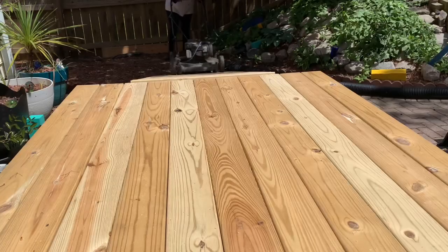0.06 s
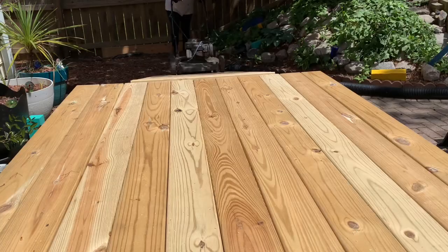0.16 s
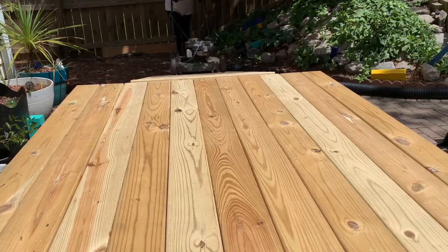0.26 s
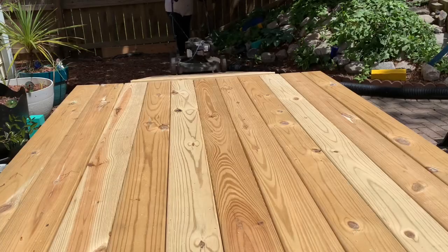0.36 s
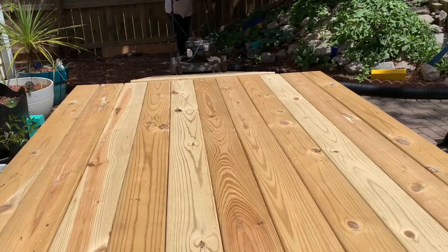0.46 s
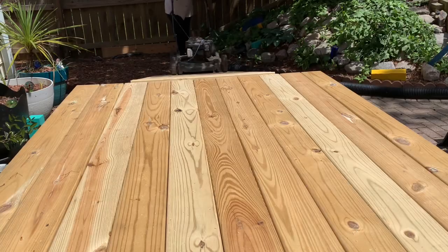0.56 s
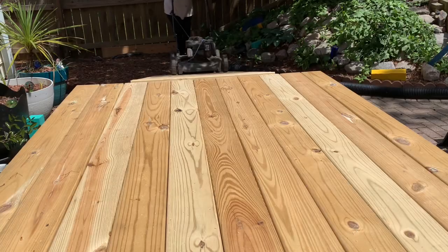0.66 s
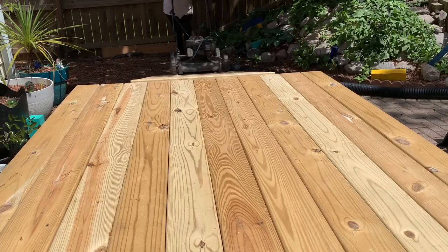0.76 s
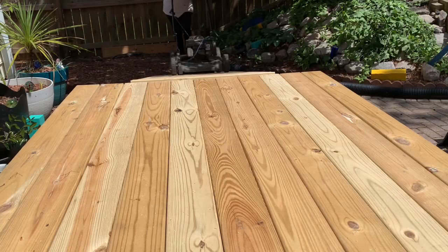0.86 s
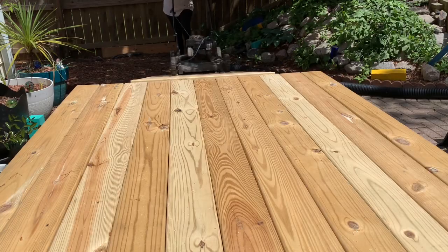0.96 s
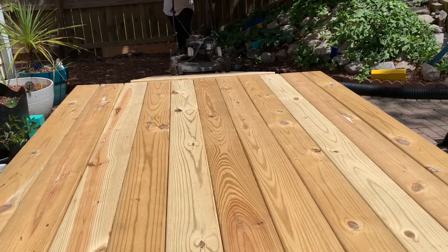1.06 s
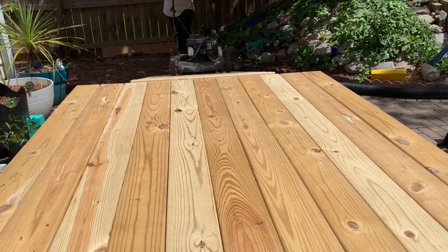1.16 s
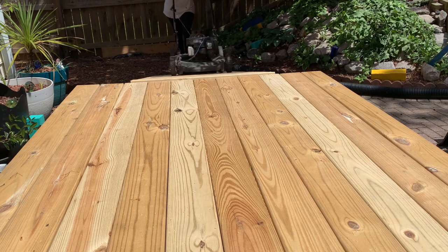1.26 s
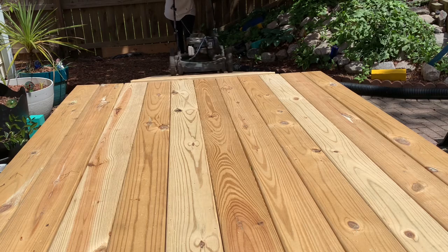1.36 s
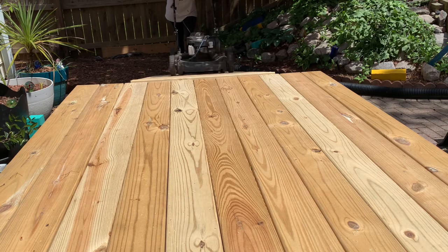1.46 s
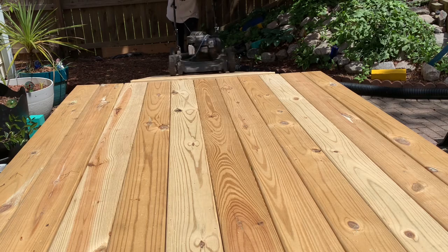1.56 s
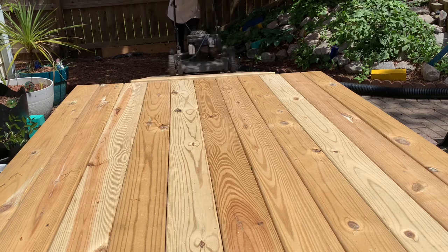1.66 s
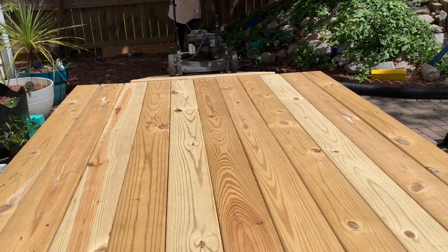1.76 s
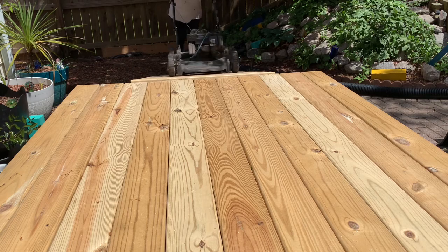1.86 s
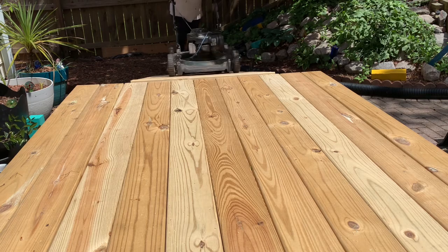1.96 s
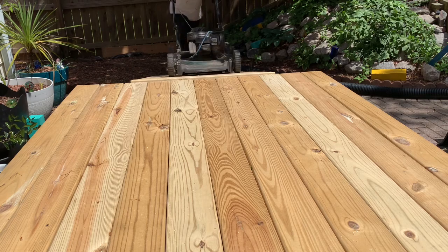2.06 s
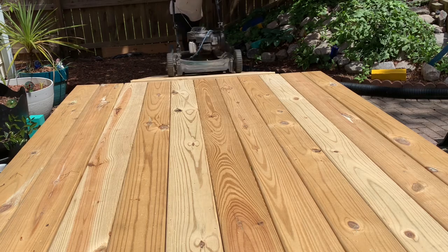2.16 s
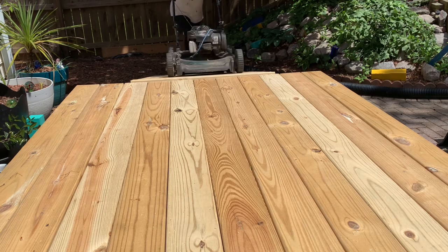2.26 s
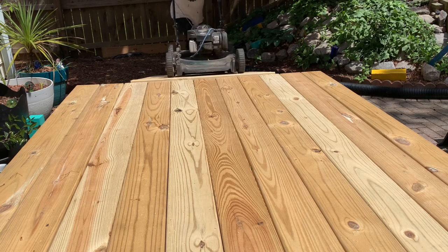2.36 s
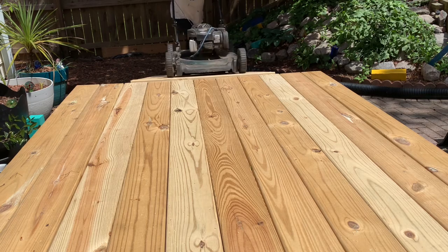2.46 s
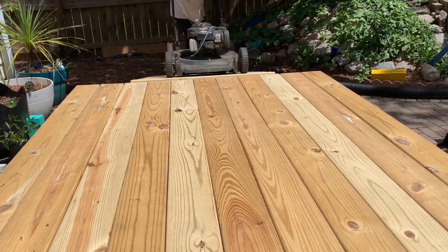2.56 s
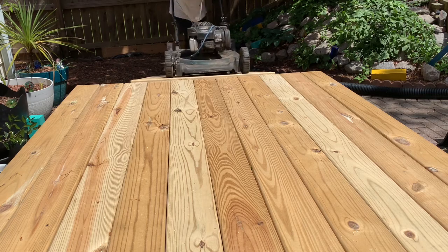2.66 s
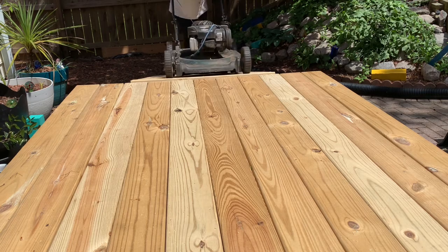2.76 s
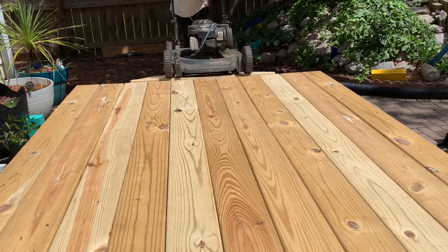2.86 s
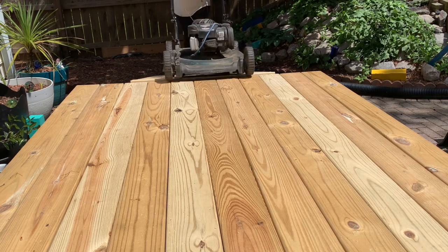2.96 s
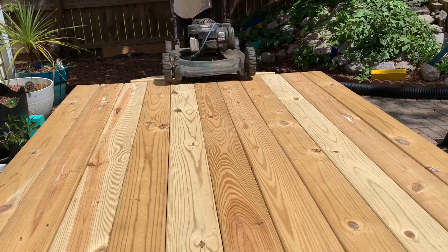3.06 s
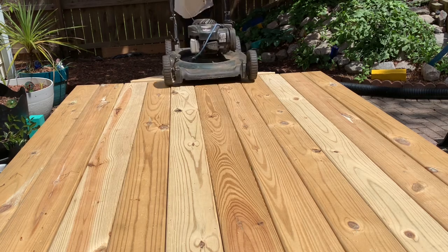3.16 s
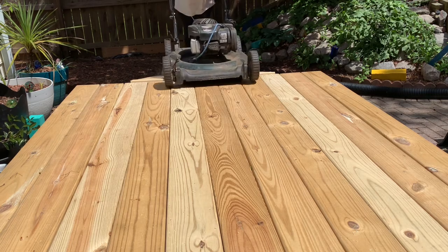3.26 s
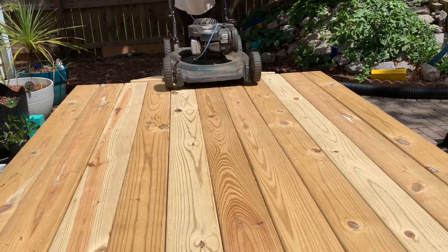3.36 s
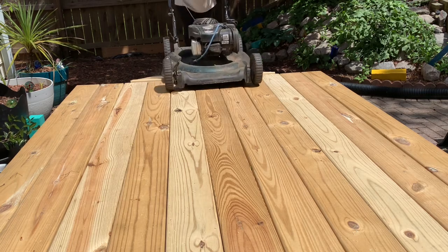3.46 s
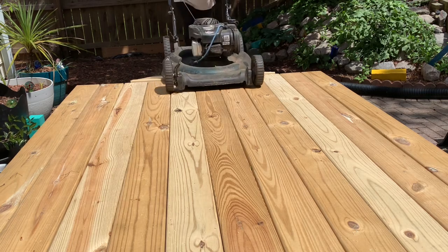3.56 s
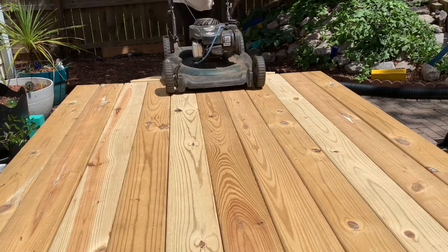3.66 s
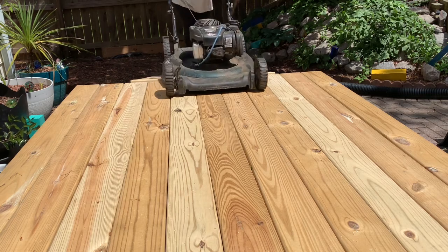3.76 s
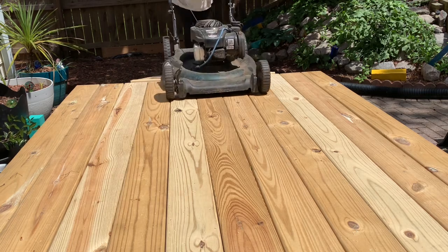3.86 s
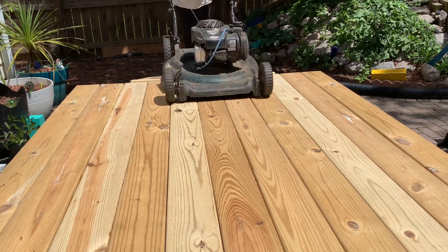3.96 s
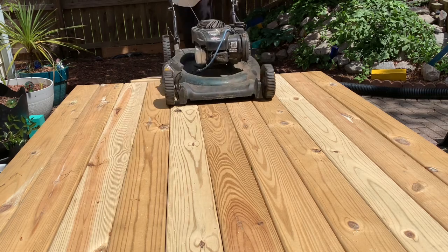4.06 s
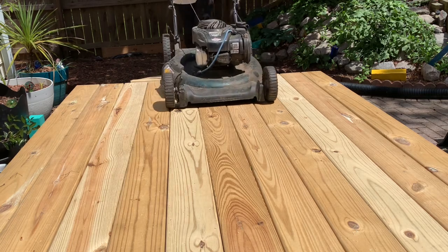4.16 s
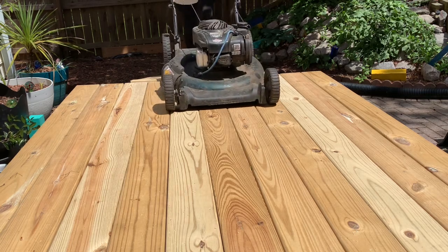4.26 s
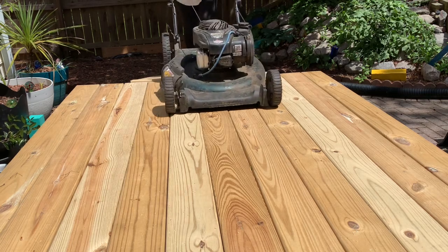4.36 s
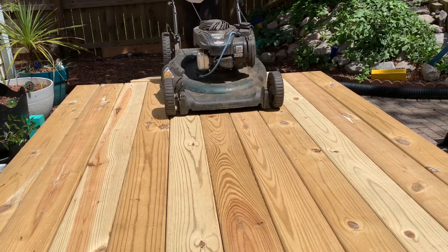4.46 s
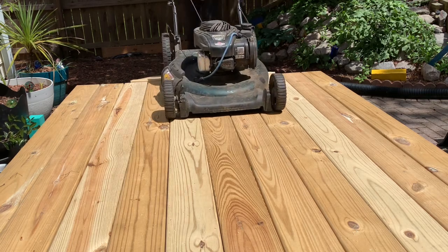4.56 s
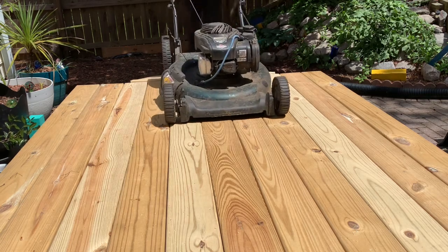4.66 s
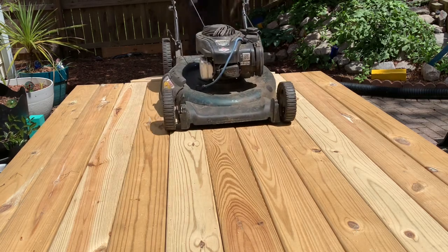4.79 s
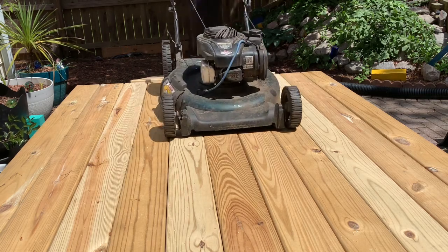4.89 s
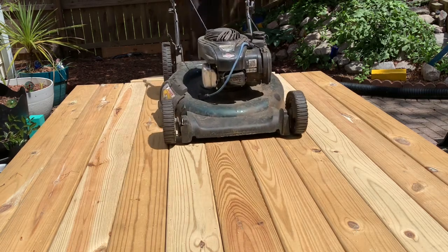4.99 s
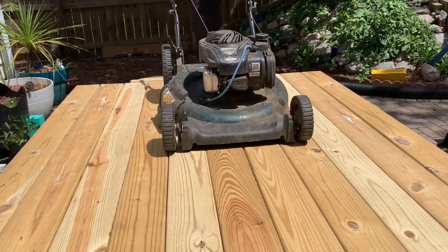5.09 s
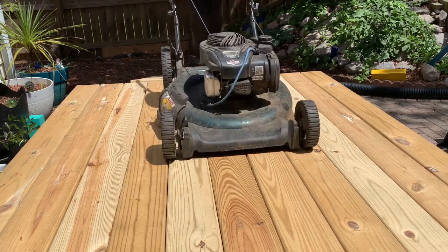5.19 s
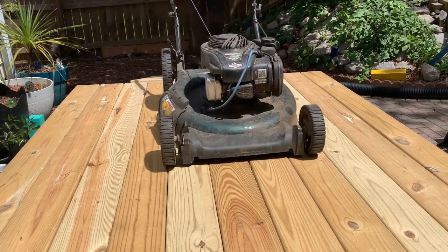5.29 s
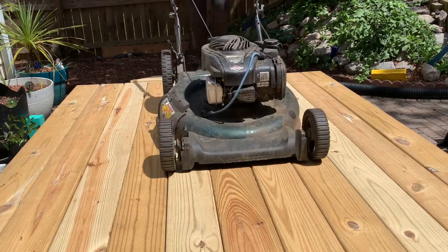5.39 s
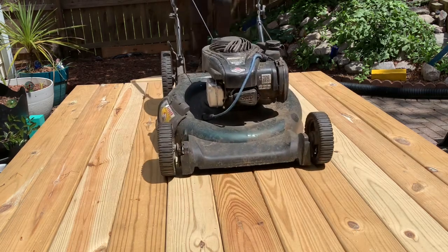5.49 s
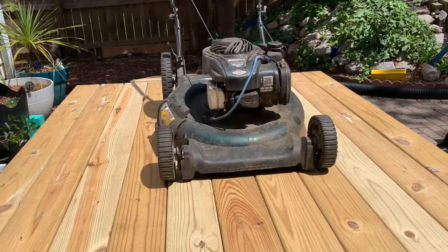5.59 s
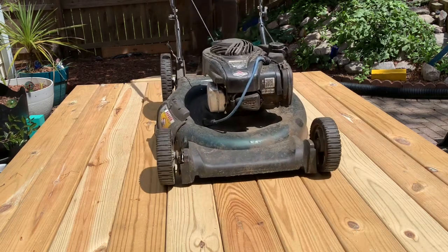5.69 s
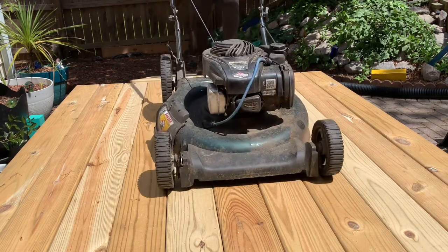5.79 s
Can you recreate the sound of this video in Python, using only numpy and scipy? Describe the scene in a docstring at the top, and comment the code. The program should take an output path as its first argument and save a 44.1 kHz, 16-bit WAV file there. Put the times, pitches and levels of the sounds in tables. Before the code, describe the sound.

A push mower with its engine off is wheeled over gritty ground, crunching softly over a low wooden boom. Knocks and loose clacks grow, then the steel housing slams and scrapes over a deck edge around three seconds. It rolls onto the boards with drumming, tread chatter and a burst of rattling, then a brief rasp. Open yard, fixed stereo microphone near the boards, faint outdoor air.

```python
"""A push mower, engine off, is rolled from rough ground up onto a deck of wooden boards in a fenced yard.
From the start the platform booms, boards drum, tyres crunch and dry litter rustles; wheels knock and grit snaps.
From 1.2 s loose hubs clack and washers jingle; from 2.9 to 3.9 s the steel housing drags over a board edge.
At 4.2 s tread slaps and chatter replace the crunch, and near 5.5 s the housing drags again, briefly.
Random impacts excite resonant modes and shaped spectra; the yard scatters them in stereo over faint outdoor air."""
import sys
import numpy as np
from scipy import signal
from scipy.fft import rfft, irfft
from scipy.io import wavfile
from scipy.ndimage import uniform_filter1d, map_coordinates

SR = 44100
rng = np.random.default_rng(int(sys.argv[2]) if len(sys.argv) > 2 else 0)


def unload_wav(signal):
    """Save mono or channel-first audio to the path in sys.argv[1] as 16-bit WAV at rate SR, clipped to [-1, 1]."""
    wavfile.write(
        sys.argv[1],
        SR,
        np.round(np.clip(np.atleast_2d(signal).T, -1, 1) * 32767).astype(np.int16),
    )


N = 257103
TIME = np.arange(N) / SR
ON_BOARDS_S = 4.2  # tread slaps and chatter replace the crunch


def undb(db):
    """Logarithmic level: decibels become an amplitude ratio."""
    return 10 ** (np.asarray(db) / 20)


def unit(x):
    """Normalisation by mean power: the rms becomes 1."""
    return x / np.sqrt(np.mean(x ** 2) + 1e-18)


def attack(x, size=1323):
    """Normalisation by onset power: the rms over the first 30 ms becomes 1."""
    return x / np.sqrt(np.mean(x[:size] ** 2))


def steady(x, span_s):
    """Automatic levelling: the running rms over span_s is held near 1."""
    power = uniform_filter1d(x ** 2, int(span_s * SR))
    return x / np.sqrt(power + np.mean(x ** 2) / 20)


def fade(t, t60):
    """Exponential damping: the level falls 60 dB in t60 seconds."""
    return np.exp(-np.log(1000) * t / t60)


def envelope(start, end, rise_s, release_t60):
    """Exponential growth up to start, a hold until end, then exponential damping."""
    rise = np.exp(np.minimum(TIME - start, 0) / rise_s)
    return rise * fade(np.maximum(TIME - end, 0), release_t60)


def walk(per_s):
    """Random modulation: smoothed random steps wander with rms 1."""
    step = int(SR / per_s)
    held = rng.standard_normal(N)[np.arange(N) // step]
    return unit(uniform_filter1d(held, step))


def add(track, s, sound):
    """Linear superposition: a sound is mixed in at time s."""
    start = max(int(s * SR), 0)
    part = sound[:N - start]
    track[start:start + len(part)] += part


def through(x, response):
    """Linear filtering: an excitation is convolved with an impulse response."""
    return signal.oaconvolve(x, response)[:len(x)]


def colour(points, size=4096):
    """Minimum phase: a folded cepstrum gives a causal, unit-energy response of the given spectral shape."""
    hz, db = np.transpose(points)
    f = np.maximum(np.arange(size // 2 + 1) * SR / size, 1)
    level_db = np.interp(np.log(f), np.log(hz), db)
    cepstrum = irfft(np.log(undb(level_db)))
    cepstrum[1:size // 2] *= 2
    cepstrum[size // 2 + 1:] = 0
    return unit(irfft(np.exp(rfft(cepstrum)))) / np.sqrt(size)


def body(modes, points, ring_db, size=16384):
    """Modal superposition: a dead blow plus damped modes, neighbours in opposite senses."""
    t = TIME[:size]
    ring = np.zeros(size)
    for k, (hz, db, t60) in enumerate(modes):
        ring += (-1) ** k * undb(db) * np.sin(2 * np.pi * hz * t) * fade(t, t60)
    blow = colour(points)
    dead_blow = np.pad(blow, (0, size - len(blow)))
    return dead_blow + undb(ring_db) * unit(ring) / np.sqrt(size)


def note(hz, t60, rise_s, size=16384):
    """A single damped mode: a sine swells over about rise_s and dies away."""
    t = TIME[:size]
    return attack(np.sin(2 * np.pi * hz * t) * fade(t, t60) * (1 - fade(t, rise_s)))


def contacts(per_s, scatter_db, size=N):
    """Random impulse excitation: small impacts of uneven strength and either sign."""
    chance, strength = rng.random(size), rng.standard_normal(size)
    struck = chance < per_s / SR
    return struck * undb(scatter_db * np.clip(strength, -2, 2)) * rng.choice([-1, 1], size)


def impact(t60, first_db, size=16384):
    """Repeated impact: an opening blow of set strength, then a dense burst of uneven contacts that dies away."""
    burst = unit(contacts(per_s=2600, scatter_db=5.0, size=size))
    force = burst * fade(TIME[:size], t60)
    force[0] = undb(first_db)
    return force


# Spectrum of the outdoor air. Each row: frequency in Hz, relative level in dB.
AIR_SPECTRUM = [(20, -29), (35, -3), (55, 13.5), (120, -2.5), (300, -29.5), (1000, -20.5), (3000, -36.5),
                (7000, -51.5), (11000, -42.5), (13500, -55.5), (16000, -82)]


def outdoor_air():
    """Broadband noise: white noise takes on the spectrum of faint outdoor air."""
    return undb(-33.5) * through(rng.standard_normal(N), colour(AIR_SPECTRUM))


TREAD_PER_S = 47.5  # tread blocks meeting the boards


def tread(jitter, scatter_db):
    """Near-periodic excitation: tread blocks slap the boards one after another."""
    slaps, chance = np.zeros(N), rng.standard_normal((N // 500, 2))
    at = ON_BOARDS_S + np.cumsum(np.exp(jitter * chance[:, 0])) / TREAD_PER_S
    heard = at < TIME[-1]
    slaps[(at[heard] * SR).astype(int)] = undb(scatter_db * chance[heard, 1])
    return slaps


# How hard the rolling wheels shake the mower, from speed and ground together.
# Each row: time in seconds, effort in dB.
EFFORT = [(0, -7), (0.92, -10.5), (1.3, -1), (1.68, 2), (1.92, -2), (2.17, -2), (2.45, 1.5), (2.9, -3.5),
          (3.17, 1.5), (3.4, -8.5), (3.92, 2), (4.2, -6.5), (4.5, -11.5), (4.68, 5), (5.07, 5), (5.42, -8),
          (5.72, -7), (5.83, -21)]
# Modes of the platform (lowest only), boards, steel housing, and wheel hubs with handle fittings.
# Each row: frequency in Hz, relative level in dB, t60 in seconds.
PLATFORM_MODES = [(102.46, -12.5, 0.83), (101.9, -17.5, 1)]
BOARD_MODES = [(59.5, -20, 0.46), (123.1, 2.5, 0.21), (131, 2, 0.38), (150.2, 5.5, 0.23), (168, -3, 0.023),
               (222.2, -6.5, 0.33), (232.7, 0.5, 0.25)]
HOUSING_MODES = [(270.3, 3.5, 0.32), (314, -2, 0.16), (369.4, 9, 0.081), (397.9, 7.5, 0.28),
                 (446, -17, 0.016), (519, -2, 0.26), (595, -15.5, 0.29), (649.6, 14, 0.039),
                 (659, 9.5, 0.072), (860, -32.5, 0.45), (879, -31.5, 0.067), (890, -19, 0.15),
                 (1150, -39.5, 0.19), (1130, -24, 0.067), (1340, -33.5, 0.036), (1540, -54.5, 0.051),
                 (1670, -21.5, 0.087), (1900, -40, 0.12)]
FITTING_MODES = [(2100, 40, 0.036), (2000, 2, 0.062), (2480, 9, .1), (2600, 15, 0.06), (2720, 7, 0.1),
                 (2960, -13.5, .06), (3190, -2, 0.13), (3950, -14.5, 0.05), (4500, -11, 0.04)]
# Spectra of boom, drumming, hum, crunch and rattle. Each row: frequency in Hz, relative level in dB.
BOOM_SPECTRUM = [(40, -26), (75, 7.5), (100, 12.5), (120, 24), (250, -35.5)]
DRUM_SPECTRUM = [(20, -37), (40, -28.5), (60, -10.5), (100, -1.5), (140, 1), (240, -5), (330, -6.5),
                 (600, -39), (1500, -89)]
HUM_SPECTRUM = [(120, -38), (230, 8.5), (380, 2), (520, -3.5), (720, -9.5), (1000, -18), (1500, -27.5),
                (3000, -70)]
CRUNCH_SPECTRUM = [(400, -4), (1000, 21.5), (1500, 13.5), (2000, 10), (3200, 10.5), (4700, 1.5),
                   (6500, -20.5), (11000, -39), (13500, -31), (16000, -55.5)]
RATTLE_SPECTRUM = [(400, -27), (1000, 14), (1450, 13), (1800, 3.5), (2150, 4), (2800, 1), (3500, -1.5),
                   (4900, -9.5), (6500, -28.5), (11000, -41), (13500, -51.5), (16000, -33.5)]
# level at effort 0 in dB, and growth in dB per dB of effort
BOOM_DB, BOOM_GROWTH = -25, 1
DRUM_DB, DRUM_GROWTH = -15.5, 1
HUM_DB, HUM_GROWTH = -23, 1
CRUNCH_DB, CRUNCH_GROWTH = -46.5, 1.62
CHATTER_DB, CHATTER_GROWTH = -47, 1.27
CRUNCH_PATCHY_DB = 2.5  # the ground is loose in patches
TREAD_DRUM_DB, TREAD_CHATTER_DB = 11.5, 4.5  # a slap against one random bump, in boards and in fittings


def rolling():
    """Roughness excitation: bumps under the wheels drive platform, boards, housing, ground and fittings."""
    effort = np.interp(TIME, *np.transpose(EFFORT))
    slaps = tread(jitter=.04, scatter_db=0.0)
    bumps = contacts(per_s=1500, scatter_db=-0.5)

    loads = contacts(per_s=500, scatter_db=7.5)
    platform = steady(through(loads, body(PLATFORM_MODES, BOOM_SPECTRUM, ring_db=12.5)), span_s=0.19)
    drumming = bumps + undb(TREAD_DRUM_DB) * slaps
    boards = steady(through(drumming, body(BOARD_MODES, DRUM_SPECTRUM, ring_db=-1.5)), span_s=0.093)
    shaking = bumps + contacts(per_s=320, scatter_db=-0.5)
    housing = unit(through(shaking, body(HOUSING_MODES, HUM_SPECTRUM, ring_db=-7.0)))
    ground = unit(through(contacts(per_s=380, scatter_db=2.0), colour(CRUNCH_SPECTRUM)))
    rattling = contacts(per_s=82, scatter_db=-0.5) + undb(TREAD_CHATTER_DB) * slaps
    fittings = unit(through(rattling, body(FITTING_MODES, RATTLE_SPECTRUM, ring_db=-12.0)))

    boom = undb(BOOM_DB + BOOM_GROWTH * effort) * platform
    drum = undb(DRUM_DB + DRUM_GROWTH * effort) * boards
    hum = undb(HUM_DB + HUM_GROWTH * effort) * housing
    patches_db = CRUNCH_PATCHY_DB * walk(per_s=22)
    crunch = undb(CRUNCH_DB + CRUNCH_GROWTH * effort + patches_db) * ground
    chatter = undb(CHATTER_DB + CHATTER_GROWTH * effort) * fittings
    return boom + drum + hum + np.where(TIME < ON_BOARDS_S, crunch, chatter)


# The platform gives under the mower's weight. Each row: start in seconds, relative peak level in dB.
BOOMS = [(0.0, -22.5), (0.882, -23), (1.162, -18), (1.599, -7.5), (2.26, -11.5), (2.498, -27), (3.883, -14),
         (4.677, -18), (4.85, -9)]
BOOM_RISE_S, BOOM_T60_S = 0.09, 0.74


def booms(size=32768):
    """Transient response: as weight shifts to a new spot, the platform's first listed mode swells and decays."""
    out, t = np.zeros(N), TIME[:size]
    mode = np.sin(2 * np.pi * PLATFORM_MODES[0][0] * t)
    ring = mode * (1 - fade(t, BOOM_RISE_S)) * fade(t, BOOM_T60_S)
    for s, db in BOOMS:
        add(out, s, undb(db) * ring / np.max(ring))
    return out


# Dry litter brushed aside. Each row: middle in seconds, Gaussian half length in seconds, relative level in dB.
RUSTLES = [(0.04, 0.028, -64.5), (0.393, 0.11, -63), (0.634, 0.036, -63.5), (0.9, 0.026, -75),
           (1.327, 0.058, -49), (1.634, 0.1, -60), (2.454, 0.09, -58), (3.157, 0.017, -22)]
# Grit cracking under the tyres. Each row: start in seconds, relative level in dB.
GRIT = [(0.2434, -35), (0.3087, -29.5), (0.371, -30), (1.5857, -23.5), (3.044, -12.5), (3.1585, -9),
        (4.298, -31), (4.691, -27), (4.8578, -10), (5.225, -21.5), (5.274, -15)]
# Spectrum shared by grit and litter. Each row: frequency in Hz, relative level in dB.
GRIT_SPECTRUM = [(800, 20), (2500, 5), (5000, 2), (8000, -2.5), (10500, 8.5), (13000, -3), (16000, -8)]


def litter(size=8192):
    """Fracture noise: leaves crush as impulses in soft swells, and grit snaps as decaying noise."""
    swell = np.zeros(N)
    for s, width, db in RUSTLES:
        swell += undb(db) * np.exp(-.5 * ((TIME - s) / width) ** 2)
    leaves = undb(11.5) * swell * unit(contacts(per_s=6000, scatter_db=0.5))
    snaps = np.zeros(N)
    for s, db in GRIT:
        snap = rng.standard_normal(size) * fade(TIME[:size], t60=0.13)
        add(snaps, s, undb(db - 12.0) * snap)
    return through(snaps + leaves, colour(GRIT_SPECTRUM))


def bend(x, lag_s, size=32768):
    """Dispersion of bending waves: the lower the pitch, the later it arrives (lag_s at 300 Hz)."""
    f = np.arange(size // 2 + 1) * SR / size
    phase = 4 * np.pi * lag_s * np.sqrt(300 * f)  # group delay is lag_s * sqrt(300 / f)
    return irfft(rfft(x, size) * np.exp(-1j * phase))[:len(x)]


# Wheels knocking over board edges. Each row: start in seconds, relative thud level in dB,
# ring of the struck spot in Hz and its level in dB, hollow note of the wheel in Hz and its level in dB,
# clank level in dB, crack level in dB, t60 of spot ring and contact burst in seconds.
KNOCKS = [(0.256, -15.5, 210, -21, 680, -42, -40, -58, 0.25),
          (0.552, -15.5, 333, -34, 690, -41, -34, -56, 0.29),
          (0.856, -17, 238.4, -29, 694, -45, -40, -60, 0.35),
          (1.112, -19.5, 156, -17.5, 710, -40, -52, -68, 0.055),
          (1.181, -15.5, 126, -18, 706, -54, -31.5, -40, 0.46),
          (1.388, -11, 141.4, -15, 640, -30.5, -27, -43.5, 0.53),
          (1.576, -9, 200, -23, 750, -31, -25, -36, 0.25),
          (1.644, -18, 235, -19, 680, -54, -39, -49, 0.067),
          (1.766, -11, 343.2, -19.5, 680, -37, -27.5, -44, 0.34),
          (1.973, -5.5, 390, -17, 777, -23.5, -23.5, -40, 0.15),
          (2.213, -9, 383.5, -10.5, 735, -24, -23, -35.5, 0.25),
          (2.404, -18, 373, -22.5, 900, -47, -19.5, -32, 0.083),
          (2.419, -5, 135, -13, 662, -21, -20, -30.5, 0.16),
          (2.438, -8, 213.2, -11.5, 620, -39, -25, -39, 0.19),
          (2.643, -9.5, 403, -18.5, 639, -25, -33, -41.5, 0.17),
          (2.925, -21, 303, -25, 710, -16, -17, -27, 0.18),
          (2.94, -7.5, 156, -13, 830, -20.5, -18.5, -33, 0.11),
          (2.985, -12.5, 275, -19, 980, -29, -34, -33, 0.064),
          (3.027, -19, 298, -19, 1190, -25.5, -28, -34, 0.057),
          (3.05, -18, 425, -25, 605, -20.5, -28, -27, 0.061),
          (3.067, -15, 437, -14, 669, -7, -12.5, -23, .14),
          (3.076, 1, 292, -12, 803, -15, -6.5, -13.5, 0.066),
          (3.084, 2, 287.4, -1, 950, -17, -7, -16, 0.11), (3.113, -3, 255, -13, 454, -10, -8.5, -23, 0.089),
          (3.139, -7, 188.6, -17, 900, -23, -12, -17.5, 0.19),
          (3.166, -13, 290, -16, 1104, -21, -17.5, -22.5, 0.1),
          (3.189, -14, 149, -14.5, 696, -34, -28, -36, 0.12),
          (3.238, -10.5, 248, -22, 700, -27, -20.5, -34, 0.3),
          (3.548, -15, 251, -23, 517, -51, -30, -52, .15),
          (3.63, -12.5, 234, -17, 1070, -31.5, -26.5, -45, 0.1),
          (3.747, -10, 250, -16.5, 594, -35, -30, -47, 0.13),
          (3.833, -5, 165, -12, 1000, -37, -21.5, -42, 0.13),
          (3.907, -9.5, 123.4, -8, 680, -45, -32, -43, 0.078),
          (3.975, -21.5, 221.6, -19.5, 690, -50, -40, -63, 0.26),
          (4.085, -18, 233, -23, 690, -52, -38, -49, 0.1),
          (4.208, -28, 201, -29, 566, -42, -45, -51.5, 0.1),
          (4.238, -8.5, 195, -16.5, 730, -37, -30, -41.5, 0.24),
          (4.252, -14, 287, -18, 1050, -32, -35, -36, 0.18),
          (4.269, -9.5, 270.6, -14, 790, -30, -24, -36, 0.15),
          (4.477, -24, 230, -36, 573, -42, -42, -57, 0.22),
          (4.604, -11.5, 238, -19.5, 687, -29, -23.5, -35.5, 0.25),
          (4.6227, -8, 308, -29, 744, -20, -16.5, -28, 0.051),
          (4.636, -8, 200, -10, 525, -30, -21.5, -42, 0.14),
          (4.73, -19, 324, -23, 712, -34, -32, -39, 0.36),
          (4.995, -27, 178.8, -10, 715, -42, -39, -50, 0.49),
          (5.058, -17, 240.8, -23, 684, -45, -26, -35, 0.33),
          (5.23, -13, 128.4, -16.5, 690, -49, -33, -58, 0.17)]
# Spectra of thud, clank and crack. Each row: frequency in Hz, relative level in dB.
THUD_SPECTRUM = [(50, -26), (90, 10.5), (140, -4.5), (260, 6.5), (400, 5.5), (600, -7), (1500, -69.5)]
CLANK_SPECTRUM = [(150, -10), (380, 6), (700, 8), (1000, -1.5), (1500, -9.5), (3000, -23), (8000, -83.5)]
CRACK_SPECTRUM = [(500, -11), (1400, 16.5), (2400, 11), (3500, 1), (5000, -3.5), (8000, -23.5),
                  (16000, -43.5)]
WHEEL_T60_S, SPOT_RISE_S = 0.065, 0.021
BEND_LAG_S = 0.004035


def knocks():
    """Impact excitation: a wheel dropping over an edge sets wood, hollow wheel and housing sounding."""
    out = np.zeros(N)
    wood, edge = colour(THUD_SPECTRUM), colour(CRACK_SPECTRUM)
    steel = body(HOUSING_MODES, CLANK_SPECTRUM, ring_db=-11.0)
    for s, thud_db, spot_hz, spot_db, wheel_hz, wheel_db, clank_db, crack_db, t60 in KNOCKS:
        force = impact(t60, first_db=8.5)
        thud = undb(thud_db - 6.5) * attack(through(force, wood))
        spot = undb(spot_db) * note(spot_hz, t60, SPOT_RISE_S)
        wheel = undb(wheel_db) * note(wheel_hz, WHEEL_T60_S, rise_s=0.0027)
        clank = undb(clank_db) * attack(through(force, steel))
        crack = undb(crack_db) * attack(through(force, edge))
        add(out, s, bend(thud + spot + wheel + clank + crack, BEND_LAG_S))
    return out


# Loose wheels clacking on their axles. Each row: start in seconds, relative clack level in dB,
# note of the hub in Hz, relative level of the bright jingle in dB.
CLACKS = [(1.187, -45, 2070, -45), (1.2182, -36, 2300, -46), (1.338, -41, 2450, -48),
          (1.4418, -25.5, 3250, -46), (1.528, -33, 2500, -47.5), (1.588, -31, 2600, -32.5),
          (1.6225, -34, 2620, -37.5), (1.6594, -38, 3020, -46), (1.72, -31, 2540, -41),
          (1.79, -24, 2370, -36.5), (1.851, -36, 2520, -49.5), (1.899, -33, 2300, -56),
          (2.395, -21.5, 2485, -52), (4.6237, -19, 1930, -61), (4.6287, -5.5, 2015, -53),
          (4.638, -22, 2070, -56), (4.6484, -13, 2440, -47), (4.6999, -18, 1920, -33.5),
          (4.7676, -23, 2080, -43), (4.81, -18.5, 2190, -35), (4.9028, -27, 2060, -44),
          (4.9384, -31, 2070, -50), (5.0138, -17, 2140, -40), (5.025, -21, 2160, -51),
          (5.0597, -15.5, 2190, -35.5), (5.067, -26, 2150, -51), (5.081, -23, 2210, -55),
          (5.1056, -17.5, 2180, -43.5), (5.1168, -20, 2240, -43.5), (5.134, -21, 2150, -46),
          (5.163, -29, 2230, -46), (5.1756, -21.5, 2200, -56), (5.202, -20, 2150, -46),
          (5.275, -21.5, 2250, -51), (5.372, -43, 2200, -57)]
# Spectrum of the jingling washer. Each row: frequency in Hz, relative level in dB.
JINGLE_SPECTRUM = [(1500, -43), (3200, 0.5), (4600, 4.5), (5600, -6.5), (6800, -12), (11000, -14),
                   (16000, -57)]
HUB_T60_S, HUB_NOTE_DB = 0.026, -4.5
JINGLE_T60_S, JINGLE_ON_BOARDS_T60_S = .22, 0.16  # rough ground keeps a washer shaking for longer


def clacks():
    """Impact at the end of play: a hub clacks and its washer jingles, its modes shifted anew each time."""
    out = np.zeros(N)
    for s, clack_db, hub_hz, jingle_db in CLACKS:
        modes = [(hz * (1 + 0.043 * rng.standard_normal()), db, t60) for hz, db, t60 in FITTING_MODES]
        blow = impact(t60=.03, first_db=30)
        hub_note = undb(HUB_NOTE_DB) * note(hub_hz, HUB_T60_S, rise_s=.002)
        hub = attack(through(blow, colour(RATTLE_SPECTRUM))) + hub_note
        steel = body(modes[5:], JINGLE_SPECTRUM, ring_db=-14)  # only the higher modes
        shaking_t60 = JINGLE_T60_S if s < ON_BOARDS_S else JINGLE_ON_BOARDS_T60_S
        washer = through(impact(shaking_t60, first_db=29), steel)
        add(out, s, undb(clack_db - 18.5) * attack(hub) + undb(jingle_db - 6.5) * attack(washer))
    return out


def stick_slip(per_s, jitter, scatter_db):
    """Stick-slip friction: an edge catches and lets go in uneven steps of uneven strength."""
    jerks, chance = np.zeros(N), rng.standard_normal((N // 50, 2))
    at = np.cumsum(np.exp(jitter * chance[:, 0])) / per_s
    heard = at < TIME[-1]
    jerks[(at[heard] * SR).astype(int)] = undb(scatter_db * chance[heard, 1])
    return jerks


def flex(x, share, per_s):
    """Frequency modulation by a varying delay: all resonances wander together by a small share."""
    lead = np.cumsum(share * walk(per_s))
    return map_coordinates(x, [np.arange(N) + lead], mode="mirror")


# Housing dragging on wood. Each row: start and end in seconds, relative groan, rasp and hiss levels in dB.
DRAGS = [(2.936, 3.851, -22.5, -34, -40.5), (5.516, 5.6, -25, -12.5, -29.5)]
# The dragging edge digs in. Each row: hardest moment in seconds, rise in seconds, release t60 in seconds,
# relative groan, rasp and hiss levels in dB.
BITES = [(2.955, 0.0058, 0.94, -24.5, -20.5, -49), (3.088, 0.0095, 0.054, -12, -6, -16),
         (3.164, 0.021, 0.7, -24, -23.5, -33.5), (3.81, 0.06, 0.23, -13.5, -23.5, -42)]
# Modes of the housing's front lip and rear skirt, which drag one after the other.
# Each row: frequency in Hz, relative level in dB, t60 in seconds.
LIP_MODES = [(700, 3, 0.027), (846, -13.5, .2), (975, -1, 0.23), (1020, -3, 0.23), (1330, -28, .12),
             (1461, -8, 0.16), (2000, -16, 0.046), (2723, -6.5, 0.058), (2890, -29, .06)]
SKIRT_MODES = [(426, 8, 0.056), (726, 3.5, 0.04), (872, -21, 0.025), (1094, 1, 0.073), (1240, 1, 0.021),
               (1620, 3, 0.044), (1706, -10.5, 0.057), (2050, -6, 0.046), (2280, -6.5, 0.073),
               (2480, -5, .045), (2640, -19, 0.081), (3270, -10.5, 0.03), (3800, -20, 0.027)]
# Spectra of groan, lip rasp, skirt rasp and hiss. Each row: frequency in Hz, relative level in dB.
GROAN_SPECTRUM = [(50, -35), (100, -5.5), (170, 2.5), (290, 9.5), (400, 2.5), (480, -7), (600, 1),
                  (780, -0.5), (1100, -11), (3000, -35), (8000, -73.5)]
RASP_SPECTRUM = [(250, -4.5), (550, 7), (950, 10.5), (1250, 2.5), (1700, -1.5), (2500, -10.5),
                 (4200, -19.5), (9000, -31)]
SKIRT_SPECTRUM = [(250, -9.5), (600, 2.5), (1150, 9), (1700, -1), (2500, -7), (3200, -2.5), (4700, -21),
                  (9000, -25.5)]
HISS_SPECTRUM = [(1200, 8.5), (3500, 13), (5000, 11.5), (7000, 8.5), (10500, 11.5), (12500, 3.5),
                 (16000, -31)]
DRAG_ATTACK_S, DRAG_RELEASE_T60_S = 0.0044, 0.051
EASE_DB_PER_S = 12.5  # pressure is greatest at both ends of a drag and eases between them
SLIPS_PER_S = 520  # stick-slip rate of the rear skirt
CATCH_DB = 4.5  # the front lip catches unevenly on the grain
FLEX_SHARE, LIP_FLEX_SHARE, FLEX_PER_S = .02, 0.013, 14  # the housing flexes, shifting its resonances


def dragging():
    """Friction excitation: steel slips on a board edge, so the housing groans and wood fibres rasp and hiss."""
    groan, rasp, hiss = np.zeros((3, N))
    for start, end, groan_db, rasp_db, hiss_db in DRAGS:
        touching = envelope(start, end, DRAG_ATTACK_S, DRAG_RELEASE_T60_S)
        inside_s = np.maximum(np.minimum(TIME - start, end - TIME), 0)
        groan += touching * undb(groan_db - EASE_DB_PER_S * inside_s)
        rasp += touching * undb(rasp_db - EASE_DB_PER_S * inside_s)
        hiss += touching * undb(hiss_db)
    for s, rise_s, t60, groan_db, rasp_db, hiss_db in BITES:
        digging = envelope(s, s, rise_s, t60)
        groan += digging * undb(groan_db)
        rasp += digging * undb(rasp_db)
        hiss += digging * undb(hiss_db)

    slips = contacts(per_s=1100, scatter_db=-2.5)
    housing = through(slips, body(HOUSING_MODES, GROAN_SPECTRUM, ring_db=-2.5))
    housing = steady(flex(housing, FLEX_SHARE, FLEX_PER_S), span_s=0.036)
    catches = slips * undb(CATCH_DB * walk(per_s=64))
    lip = through(catches, body(LIP_MODES, RASP_SPECTRUM, ring_db=2.0))
    lip = steady(flex(lip, LIP_FLEX_SHARE, FLEX_PER_S), span_s=.07)
    jerks = stick_slip(SLIPS_PER_S, jitter=0.5, scatter_db=2.5)
    skirt = through(jerks, body(SKIRT_MODES, SKIRT_SPECTRUM, ring_db=2.5))
    skirt = steady(flex(skirt, FLEX_SHARE, FLEX_PER_S), span_s=.02)
    fibres = unit(through(contacts(per_s=9100, scatter_db=4.5), colour(HISS_SPECTRUM)))
    edge = np.where(TIME < ON_BOARDS_S, lip, skirt)
    return groan * housing + rasp * edge + hiss * fibres


# Phase by which the left microphone port leads the right. Each row: frequency in Hz, phase in radians.
PORT_PHASE = [(0, 0), (750, 0.81), (1800, 0), (3300, 2.5), (5500, 3), (6700, -0.5), (8500, -8.5),
              (11100, -5), (16500, -17.5)]
# Spectrum of the sound that the yard scatters. Each row: frequency in Hz, relative level in dB.
SCATTER_SPECTRUM = [(60, -35), (200, -15.5), (450, -6.5), (900, -3), (2000, 1), (6000, 2.5), (11000, -10.5),
                    (16000, 0)]


def ports(x):
    """Interchannel phase: two ports hear the direct sound out of step, the right one with more bass."""
    f = np.arange(N // 2 + 1) * SR / N
    bass = undb(1.62 / (1 + (f / 280) ** 4))
    lag = np.exp(-1j * np.interp(f, *np.transpose(PORT_PHASE)))
    return undb(-3.0) * irfft(rfft(x) * np.array([1 / bass, bass * lag]), N)


def yard(x, size=16384, count=20):
    """Diffuse reflection: boards and fence scatter sound differently at each port and spot along the way."""
    t = TIME[:size]
    out = ports(x)
    boards = unit(fade(t, t60=0.037) * (1 - fade(t, t60=0.007)))
    fence = unit(fade(t, t60=0.27) * (1 - fade(t, t60=0.043)))
    echoes = np.hypot(undb(-3.0) * boards, undb(-10.0) * fence) / np.sqrt(size)
    scattered = through(x, colour(SCATTER_SPECTRUM))
    step_s = N / SR / count
    for spot_s in np.arange(count + 1) * step_s:
        near = np.flatnonzero(np.abs(TIME - spot_s) < step_s)
        # overlapping cosine windows crossfade from spot to spot
        part = scattered[near] * np.cos(np.pi / 2 * (TIME[near] - spot_s) / step_s)
        for port in out:
            add(port, TIME[near[0]], signal.fftconvolve(part, echoes * rng.standard_normal(size)))
    return out


def scene():
    """Superposition of sources: the mower and the faint outdoor air each sound through the yard."""
    mower = rolling() + booms() + litter() + knocks() + clacks() + dragging()
    return yard(mower) + yard(outdoor_air())


def record(dry):
    """Band limiting and overload: the deepest bass is shed, peaks clip at full scale, and the top is cut."""
    lean = signal.sosfilt(signal.butter(2, 42, "high", fs=SR, output="sos"), dry)
    clipped = np.clip(lean, -1, 1)
    return signal.sosfilt(signal.ellip(8, .2, 70, 16300, fs=SR, output="sos"), clipped)


dry = scene()
out = record(dry)
unload_wav(out)
```